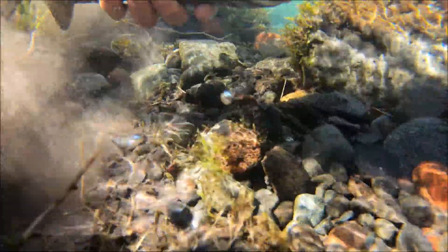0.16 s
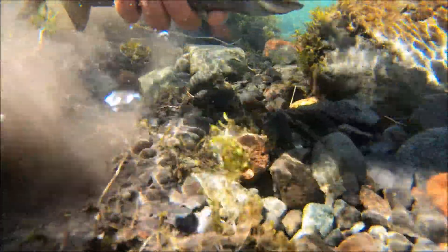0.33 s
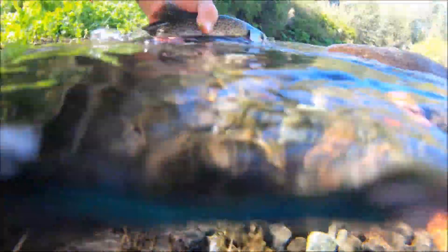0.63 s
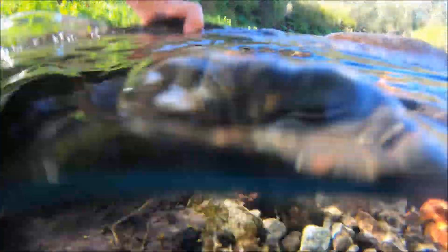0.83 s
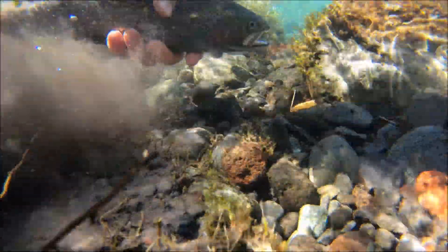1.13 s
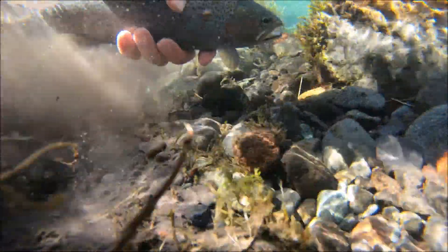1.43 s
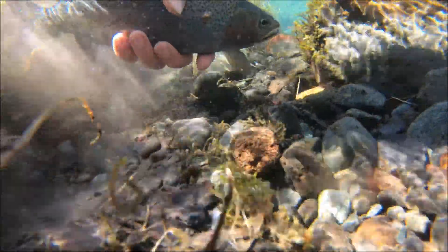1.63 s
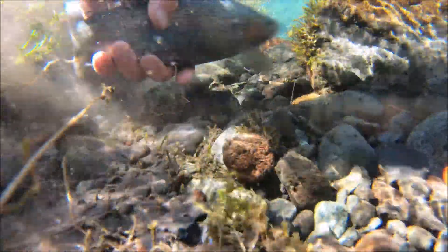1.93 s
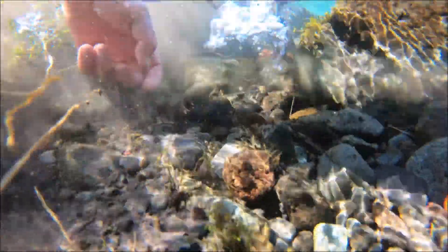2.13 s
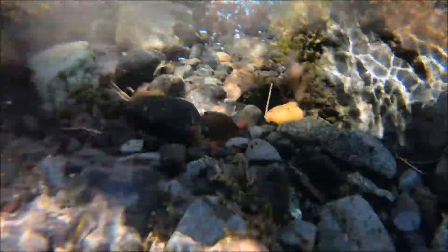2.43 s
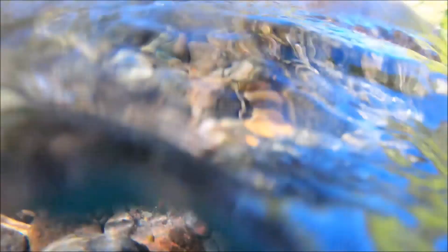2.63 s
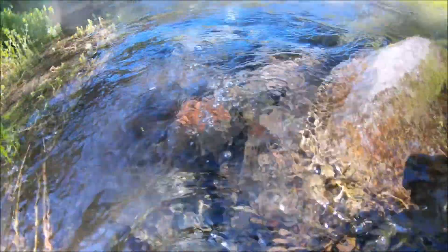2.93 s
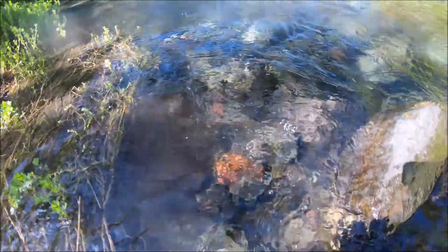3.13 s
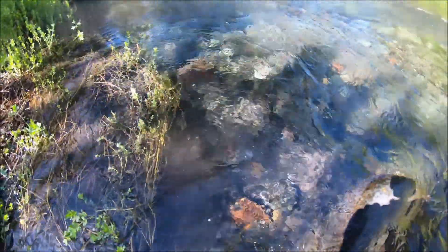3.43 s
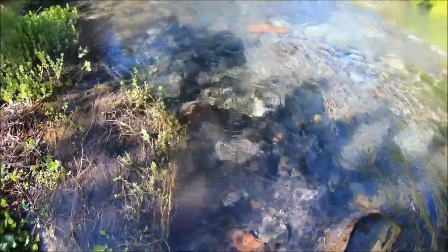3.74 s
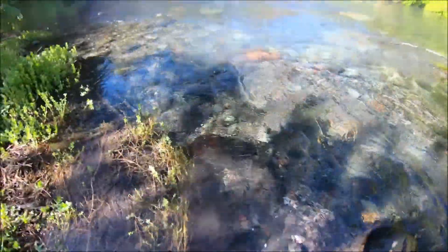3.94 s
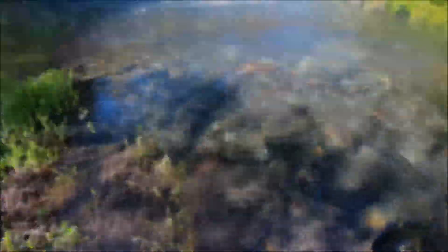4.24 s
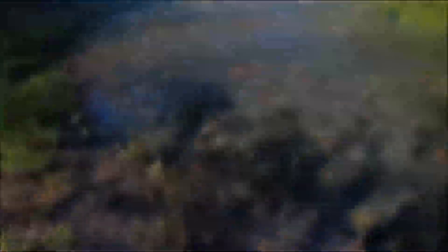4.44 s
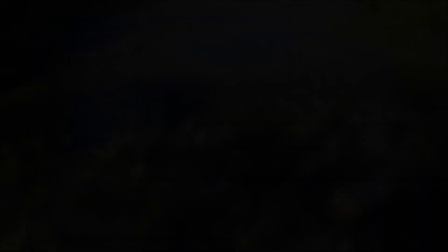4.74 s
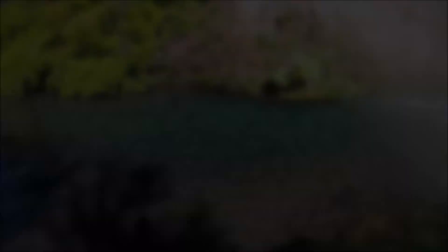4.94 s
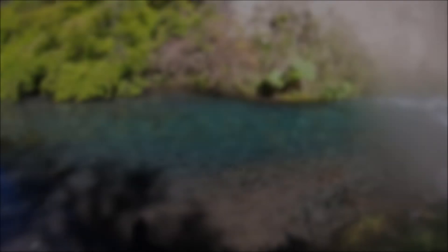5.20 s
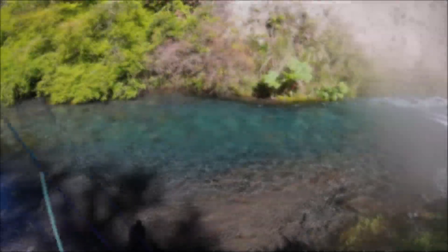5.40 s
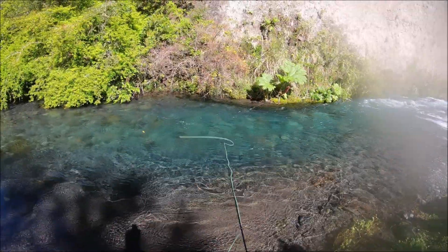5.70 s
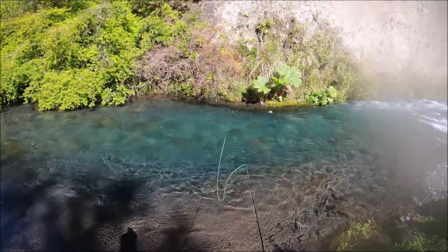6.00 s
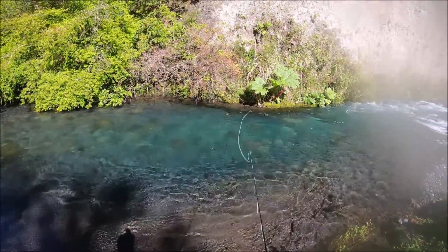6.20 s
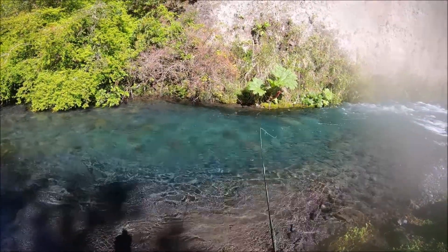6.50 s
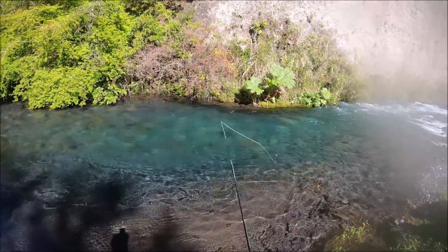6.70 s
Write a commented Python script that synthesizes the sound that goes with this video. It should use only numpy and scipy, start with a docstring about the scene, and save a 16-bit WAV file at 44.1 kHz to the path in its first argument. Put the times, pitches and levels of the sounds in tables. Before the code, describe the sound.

A shallow river rushes, heard through a microphone just under the surface. The sound quickly turns muffled and slowly fades while bubbles tick and plink on the camera case. A released fish makes soft knocks, gulps and sloshes, and droplets crackle as the case is lifted out. With a click, the river suddenly becomes brighter and louder, rushing steadily in open air with light wind on the microphone.

```python
"""River riffle, under water then in air

A shallow riffle rushes, heard from a camera case dipped just under the surface. The treble closes,
muffling the rush; bubbles tick on the case, and a released fish knocks and gulps in the current.
The case is lifted out still wet, then all at once the rush is bright, in open air."""
import sys
import numpy as np
from scipy import signal
from scipy.fft import rfft, irfft, next_fast_len
from scipy.io import wavfile
from scipy.ndimage import map_coordinates

SR = 44100
rng = np.random.default_rng(int(sys.argv[2]) if len(sys.argv) > 2 else 0)


def pcm_store(signal):
    """Save signal as 16-bit PCM."""
    levels = np.round(np.clip(np.atleast_2d(signal), -1, 1) * 32767)
    wavfile.write(sys.argv[1], SR, levels.astype(np.int16).T)


N = 302526


def amp(db):
    """Decibels to gain."""
    return 10 ** (np.asarray(db) / 20)


def unit(x):
    """Scale to rms 1."""
    return x / np.sqrt(np.mean(x ** 2) + 1e-20)


def clock():
    """Time of every sample, s."""
    return np.arange(N) / SR


def bell(middle_s, half_s):
    """Gaussian swell, 0 to 1 and back."""
    return np.exp(-((clock() - middle_s) / half_s) ** 2)


def swells(rows):
    """Summed gain of (middle_s, half_s, level_db) swells."""
    return sum(amp(level_db) * bell(middle_s, half_s) for middle_s, half_s, level_db in rows)


def wobble(rate_hz):
    """Smooth random curve, rate_hz knots a second."""
    knots = rng.standard_normal(int(N * rate_hz / SR) + 4)
    return map_coordinates(knots, [np.arange(N) * rate_hz / SR])


def filtered(x, response):
    """Apply the gain response(hz)."""
    size = next_fast_len(N + SR // 4)
    return irfft(rfft(x, size) * response(np.fft.rfftfreq(size, 1 / SR)), size)[:N]


def coloured(x, spectrum):
    """Shape by (freq_hz, gain_db) points on a log axis; rms 1."""
    freq_hz, gain_db = np.transpose(spectrum)
    return unit(filtered(x, lambda hz: amp(np.interp(np.log(hz + 1), np.log(freq_hz + 1), gain_db))))


def banded(x, centre_hz, width_oct):
    """Gaussian band-pass; rms 1."""
    distance = np.log2((np.fft.rfftfreq(len(x), 1 / SR) + 1) / centre_hz) / width_oct
    return unit(irfft(rfft(x) * np.exp(-distance ** 2), len(x)))


def band_noise(size, centre_hz, width_oct):
    """Noise in a Gaussian band; rms 1."""
    return banded(rng.standard_normal(size), centre_hz, width_oct)


def bubbles(count, lo_hz, hi_hz, ring_cycles, spread_db):
    """Cloud of damped sines, each rising slightly as its bubble nears the surface; rms 1."""
    when, pick, size = rng.random((count, 3)).T[:, :, None]
    pitch_hz = lo_hz * (hi_hz / lo_hz) ** pick
    n = np.arange(SR // 60)
    cycles = pitch_hz * n / SR
    age = cycles / ring_cycles
    strength = amp(-spread_db * np.log(1 - 0.99 * size)) * pitch_hz  # about equal energy per Hz
    envelope = (1 - np.exp(-cycles ** 2)) * np.exp(-3 * age)
    rings = strength * envelope * np.sin(2 * np.pi * cycles * (1 + 0.012 * np.minimum(age, 2)))
    samples = (when * N).astype(int) + n
    return unit(np.bincount(samples.ravel(), rings.ravel(), N)[:N])


def add(track, start_s, sound):
    """Mix a short sound in at start_s."""
    start = round(start_s * SR)
    sound = sound[max(-start, 0):]
    part = track[max(start, 0):][:len(sound)]
    part += sound[:len(part)]


def riffle(spectrum, bubble_db, surge_db):
    """Far bubbles merge into a rush, nearer ones stand out, and the flow surges slightly."""
    near = bubbles(count=5000, lo_hz=357.5, hi_hz=5930, ring_cycles=9.7, spread_db=3.5)
    water = rng.standard_normal(N) + amp(bubble_db) * near
    return coloured(water, spectrum) * amp(surge_db * unit(wobble(1.8) + wobble(13)))


def close_treble(x, skirt_hz):
    """The treble closes: a steep low-pass edge drops fast, then sinks slowly, muffling the rush."""
    # low-pass edge: time_s, edge_hz
    edge = [(0.15, 4800), (0.36, 4400), (0.46, 3400), (0.5, 2500), (0.6, 1980), (0.76, 1840), (0.98, 1480),
            (1.5, 1424), (2.5, 1300), (3.35, 1300), (4.05, 1180)]
    hz, t, spectrum = signal.stft(x, SR, nperseg=512)
    edge_hz = np.interp(t, *np.transpose(edge))
    passed = (1 - np.tanh((hz[:, None] - edge_hz) / skirt_hz)) / 2
    return signal.istft(spectrum * np.sqrt(passed), SR, nperseg=512)[1][:N]


def fade_db(hold_s=0.63, db_per_s=3.5):
    """The muffled rush holds, then fades steadily."""
    return -db_per_s * np.maximum(clock() - hold_s, 0)


def muffled_rush():
    """The riffle, dulled; its surface echo comes ever later as the case rises to a stop."""
    # dulled spectrum: freq_hz, gain_db
    dulled = [(25, -16.5), (100, -16.5), (145, 0), (200, 1), (300, -4.5), (560, -6), (900, -11),
              (1150, -18.5), (1600, -19), (2500, -24), (3500, -32), (5000, -41.5), (11000, -47)]
    rise_s, settle_s, echo_peak_s, final_delay_s, echo_gain = 2.14, 0.72, 0.32, 0.00346, 0.26
    rush = riffle(dulled, bubble_db=-12, surge_db=0.5)
    rising_s = np.maximum(clock() - rise_s, 0)
    delay_s = final_delay_s * (1 - np.exp(-rising_s / settle_s))
    age = rising_s / echo_peak_s
    echo_swell = (age * np.exp(1 - age)) ** 2
    strength = echo_gain * echo_swell
    echo = map_coordinates(rush, [(clock() - delay_s) * SR], order=1)
    rush = (rush + strength * echo) / np.sqrt(1 + strength ** 2)
    lows = filtered(rush, lambda hz: 1 / (1 + (hz / 360) ** 6))
    rush = rush - 0.47 * bell(middle_s=2.58, half_s=1) * lows  # lows thin near the surface
    fish_wake_db = 3.5 * bell(middle_s=2.305, half_s=0.18)
    level_db = -25 + fade_db() + fish_wake_db - echo_swell  # 1 dB dip at the strongest echo
    return close_treble(rush, skirt_hz=113) * amp(level_db)


def lingering_hiss(release_s=0.038):
    """Narrow glassy bands of hiss linger as the treble closes, then stop one by one."""
    # hiss bands: end_s, centre_hz, width_oct, level_db
    bands = [(0.76, 2200, 0.025, -61), (0.58, 2280, 0.033, -52), (0.61, 3010, 0.05, -53),
             (0.607, 3970, 0.031, -59.5), (0.455, 4540, 0.02, -64.5), (0.29, 8300, 0.01, -68),
             (0.36, 8100, 0.014, -70), (0.34, 8650, 0.03, -70)]
    out, t = np.zeros(N), np.arange(2 * SR) / SR
    for end_s, centre_hz, width_oct, level_db in bands:
        gate = np.clip((end_s - t) / release_s, 0, 1)
        add(out, 0, amp(level_db) * band_noise(len(t), centre_hz, width_oct) * gate)
    return out


def thin_hiss(final_hz=12000, half_width_hz=2700, length_s=1.1, fade_db_per_s=6):
    """Faint top treble narrows towards one pitch and vanishes."""
    hiss = band_noise(next_fast_len(N), centre_hz=10000, width_oct=0.21)
    hz, t, spectrum = signal.stft(hiss, SR, nperseg=512)
    inside = np.abs(hz[:, None] - final_hz) < half_width_hz * (1 - t / length_s)
    return signal.istft(spectrum * inside * amp(-66.5 - fade_db_per_s * t), SR, nperseg=512)[1][:N]


def eddies():
    """The current buffets the case: uneven rumble that fades with the rush and swells in surges."""
    # rumble spectrum: freq_hz, gain_db
    rumble = [(15, -9), (35, 1), (70, -7), (120, -6), (250, -21), (800, -62), (2000, -100)]
    # surges of current: middle_s, half_s, level_db
    surges = [(1.667, 0.018, -38), (2.385, 0.69, -39.5), (2.495, 0.033, -30.5)]
    steady = amp(-40 + 1.6 * fade_db() + 2.4 * wobble(7.6))
    return coloured(rng.standard_normal(N), rumble) * (steady + swells(surges))


def fizz(fade_db_per_s=4, drain_s=3.15, drain_length_s=0.6):
    """Tiny bubbles crackle on the case: fading, stirred by the wake, fainter once the case drains."""
    # case transmission: freq_hz, gain_db
    case = [(500, -21.5), (1400, 6.5), (2200, 1), (2750, -3.5), (3700, -8.5), (4600, -17), (6200, -34),
            (8000, -22.5), (10300, -29.5), (12500, -20), (15000, -28.5)]
    crackle = bubbles(count=4000, lo_hz=1520, hi_hz=7050, ring_cycles=6.8, spread_db=2.5)
    crackle += amp(5) * rng.standard_normal(N)
    drain_db = 4.5 * np.clip((clock() - drain_s) / drain_length_s, 0, 1)
    stir_db = 6 * bell(middle_s=2.13, half_s=0.12)
    level_db = -56.5 - fade_db_per_s * clock() - drain_db + stir_db
    return coloured(crackle, case) * amp(level_db + 1.2 * wobble(25))


def spray(floor_db=-92.5):
    """Very fine spray sparkles, swelling as the case breaks or nears the surface."""
    # spray spectrum: freq_hz, gain_db
    sparkle = [(6000, -25.5), (8000, -6), (10300, -10), (12500, -1), (15000, -6)]
    # spray bursts: middle_s, half_s, level_db
    bursts = [(0.89, 0.035, -83), (1.15, 0.16, -90), (2.43, 0.018, -76), (2.95, 0.4, -88.5)]
    mist = bubbles(count=3000, lo_hz=7000, hi_hz=15000, ring_cycles=8, spread_db=1.5)
    mist += rng.standard_normal(N)
    return (amp(floor_db) + swells(bursts)) * coloured(mist, sparkle) * amp(2 * wobble(30))


def sloshes():
    """Wavelets lap at the case; each swells and sinks, sputtering."""
    # wavelets: middle_s, half_s, level_db, centre_hz
    wavelets = [(0.017, 0.026, -59, 5000), (0.06, 0.02, -64, 3800), (0.082, 0.007, -44, 4440),
                (0.103, 0.025, -47.5, 4460), (0.21, 0.03, -67, 4500), (0.675, 0.0099, -60, 3170),
                (0.76, 0.16, -45.5, 1180), (1.15, 0.015, -74, 4000), (2.115, 0.015, -50.5, 1960),
                (2.168, 0.0083, -30.5, 740), (2.2, 0.018, -35.5, 950), (2.434, 0.02, -70, 4500),
                (2.45, 0.16, -39, 950), (2.799, 0.014, -43, 1240), (3.078, 0.12, -51, 1430),
                (3.218, 0.015, -54, 1700), (3.304, 0.067, -53.5, 1514), (3.483, 0.078, -61.5, 1450),
                (3.74, 0.051, -58.5, 1450)]
    out = np.zeros(N)
    for middle_s, half_s, level_db, centre_hz in wavelets:
        width_oct = 0.42 * np.sqrt(centre_hz / 1000)  # brighter is wider
        splash = band_noise(next_fast_len(N), centre_hz, width_oct)[:N]
        out += amp(level_db) * bell(middle_s, half_s) * splash
    return out * unit(amp(2.5 * wobble(180)))


def ticks(attack_s=0.0004, t60_s=0.0067, spatter_db=-1):
    """Bubbles and droplets burst on the case: one crack plus a few ms of spatter, band-passed."""
    # bursts: start_s, level_db, centre_hz, width_oct
    bursts = [(0.018, -25.5, 6000, 1), (0.0735, -27, 3600, .7), (0.195, -41, 4200, 0.74),
              (0.686, -59, 5540, .9), (0.7644, -33, 2100, 0.65), (0.775, -33, 1950, .4),
              (0.924, -41, 1900, 0.44), (0.984, -36, 2000, .3), (0.905, -55, 13800, .2),
              (0.965, -22.5, 1850, 0.41), (0.9636, -20.5, 2990, 0.34), (0.9637, -54, 7500, .5),
              (1.0852, -57, 13500, .2), (1.168, -59, 8500, .7), (1.3545, -25, 1600, 0.68),
              (1.3554, -40, 4100, 0.2), (1.3545, -58, 12400, 0.14), (1.476, -41, 1900, .4),
              (1.5335, -43, 2100, 0.67), (1.719, -50.5, 4600, 0.71), (1.9935, -48, 2400, 0.55),
              (2.0253, -51, 8700, .35), (2.0615, -52, 3600, .45), (2.3325, -56, 7700, .25),
              (2.393, -54, 3800, .6), (2.421, -45, 3700, .8), (2.4262, -48, 4700, .35),
              (2.4375, -42, 4200, .6), (2.5, -40, 2400, 0.68), (2.5063, -36, 2300, 0.59),
              (2.553, -47, 2600, .6), (2.5535, -60, 12000, .25), (2.6005, -47, 2680, 0.6),
              (2.621, -55, 2900, .5), (2.649, -53, 3470, 0.33), (2.689, -40, 2300, 0.4),
              (2.7035, -39, 2200, 0.39), (2.708, -48, 2600, 0.33), (2.745, -57, 12400, .14),
              (2.804, -36, 1750, 0.48), (2.819, -34, 1900, 0.46), (2.832, -60, 12500, .35),
              (2.959, -60, 3300, .9), (3.128, -56, 3280, .55), (3.24, -56, 3300, .4),
              (3.3215, -68, 12900, .25), (3.987, -49, 1700, .5)]
    out, t = np.zeros(N), np.arange(SR // 40) / SR
    envelope = (1 - np.exp(-(t / attack_s) ** 2)) * amp(-60 * t / t60_s)
    crack = unit(signal.unit_impulse(len(t), np.argmax(envelope)))
    for start_s, level_db, centre_hz, width_oct in bursts:
        spatter = amp(spatter_db) * unit(envelope * rng.standard_normal(len(t)))
        padded = np.pad(crack + spatter, (len(t), 0))  # room for pre-ringing
        snap = banded(padded, centre_hz, width_oct)
        snap *= np.linalg.norm(envelope) / np.linalg.norm(snap)
        add(out, start_s - len(t) / SR, amp(level_db) * snap)
    return out


def plinks(t60_cycles=49):
    """Near bubbles ring and rise in pitch; small ones die soonest."""
    # near bubbles: start_s, level_db, pitch_hz
    near = [(0.073, -24.5, 3050), (0.716, -22, 1445), (0.715, -30, 1720), (0.712, -42, 3100),
            (1.816, -55, 3700), (2.007, -47, 3750), (2.122, -48, 3600), (2.131, -46, 3350),
            (2.309, -33, 1450), (2.3456, -28, 2100), (2.4373, -34, 7530), (2.648, -38, 3400),
            (2.792, -54, 3750), (2.8635, -51, 3000), (2.969, -33, 1590), (3.001, -48, 2330),
            (3.335, -46, 2180)]
    out, t = np.zeros(N), np.arange(SR // 10) / SR
    for start_s, level_db, pitch_hz in near:
        cycles = pitch_hz * t
        age = cycles / t60_cycles
        envelope = amp(level_db - 60 * age) * (1 - np.exp(-cycles ** 2))
        add(out, start_s, envelope * np.sin(2 * np.pi * cycles * (1 + 0.03 * age)))
    return out


def air_pockets(pockets):
    """Each air pocket swells into a short, low, gliding note and dies away."""
    out, t = np.zeros(N), np.arange(SR // 6) / SR
    for start_s, level_db, pitch_hz, swell_s, glide_oct_per_s in pockets:
        age = t / swell_s
        phase = 2 * np.pi * np.cumsum(pitch_hz * 2 ** (glide_oct_per_s * (t - swell_s))) / SR
        note = np.sin(phase) + amp(-17.5) * band_noise(len(t), pitch_hz, width_oct=0.81)
        add(out, start_s, amp(level_db) * (age * np.exp(1 - age)) ** 2 * note)
    return out


def gurgles(count=60, lo_hz=384, hi_hz=1300, swell_cycles=4.3, until_s=2.9):
    """Small pockets gulp at random, fading with the rush, until the case leaves the water."""
    when, pick, size, bend = rng.random((count, 4)).T
    pitch_hz = lo_hz * (hi_hz / lo_hz) ** pick
    level_db = -28.5 - 12.5 * size - 1.5 * np.log2(pitch_hz / lo_hz)
    glide_oct_per_s = 5 * (2 * bend - 1)
    pockets = zip(when * until_s, level_db, pitch_hz, swell_cycles / pitch_hz, glide_oct_per_s)
    return amp(fade_db()) * air_pockets(pockets)


def gulps():
    """The splash drags pockets of air under."""
    # air pockets: start_s, level_db, pitch_hz, swell_s, glide_oct_per_s
    pockets = [(0.875, -24, 645, 0.007, 5), (0.903, -21.5, 868, 0.0056, 3), (1.226, -21, 422, 0.0077, -1),
               (1.83, -26.5, 210, 0.012, 1.5), (2.022, -20.5, 806, 0.006, -3),
               (2.036, -20.5, 199, 0.012, 6), (2.068, -29, 205, 0.011, 3), (2.0885, -18, 723, 0.0067, -4),
               (2.139, -25.5, 303, 0.0088, 26), (2.163, -22, 740, 0.0043, -6),
               (2.179, -32, 1113, 0.0077, 1.5), (2.374, -22, 386, 0.0054, 1), (2.611, -29, 662, 0.0062, 1),
               (2.773, -38, 1186, 0.004, 4)]
    return air_pockets(pockets)


def knocks(attack_s=0.00046):
    """Soft bumps thud in the water-damped case; neighbouring modes swing in opposite directions."""
    # case modes in water: pitch_hz, level_db, t60_s
    modes = [(59.5, -9, 0.081), (172, 0.5, 0.029), (258, -1.5, 0.018), (600, -2.5, 0.0086)]
    # bumps: start_s, gain_db
    bumps = [(1.6535, -3.5), (1.7001, -14.5), (1.7228, -14.5)]
    out, t = np.zeros(N), np.arange(SR // 6) / SR
    thud = sum((-1) ** k * amp(level_db - 60 * t / t60_s) * np.sin(2 * np.pi * pitch_hz * t)
               for k, (pitch_hz, level_db, t60_s) in enumerate(modes))
    thud *= 1 - np.exp(-t / attack_s)
    for start_s, gain_db in bumps:
        add(out, start_s, -amp(gain_db) * thud)
    return out


def trickle():
    """Droplets crackle off the case as it is lifted."""
    drops = bubbles(count=2000, lo_hz=1400, hi_hz=3700, ring_cycles=7, spread_db=5)
    return amp(-72.5) * drops * bell(middle_s=2.64, half_s=0.38)


def bright_rush():
    """The riffle in open air."""
    # open-air spectrum: freq_hz, gain_db
    spectrum = [(25, -14.5), (60, -13.5), (110, -4.5), (150, -1), (200, 0.5), (320, -3.5), (650, -8.5),
                (1100, -15.5), (2000, -24), (2900, -29), (3900, -35.5), (5300, -35), (6400, -43.5),
                (10700, -51.5), (11500, -61.5), (13000, -59), (15000, -72)]
    return amp(-25.5) * riffle(spectrum, bubble_db=-15.5, surge_db=0.15)


def breeze():
    """Light, gusty wind rumbles on the microphone port."""
    # buffeting spectrum: freq_hz, gain_db
    buffet = [(20, -22), (48, -15), (62, 4), (85, 4), (115, -6.5), (200, -11), (800, -75)]
    # gusts: middle_s, half_s, level_db
    gusts = [(4.388, 0.054, -34), (5.14, 0.063, -36), (5.5, 0.061, -33), (6.73, 0.097, -35.5)]
    wind = amp(-44 + 2.5 * wobble(9.5)) + swells(gusts)
    return coloured(rng.standard_normal(N), buffet) * wind


def scene(open_s=4.069, crossfade_s=0.0005, click_decay_s=0.00051):
    """The wet, muffled sound gives way abruptly to open air, with a click."""
    wet = muffled_rush() + lingering_hiss() + thin_hiss() + eddies() + fizz() + spray() + trickle()
    wet += sloshes() + ticks() + plinks() + gulps() + gurgles() + knocks()
    air = breeze() + bright_rush()
    opened = np.clip((clock() - open_s) / crossfade_s, 0, 1)
    out = (1 - opened) * wet + opened * air
    click = -amp(-21) * np.exp(-np.arange(SR // 100) / SR / click_decay_s)
    add(out, open_s, click)
    return out[None]


def record(dry, top_hz=15600):
    """Steep low-pass at the band limit."""
    return np.array([filtered(channel, lambda hz: 1 / (1 + (hz / top_hz) ** 80)) for channel in dry])


dry = scene()
out = record(dry)
pcm_store(out)
```